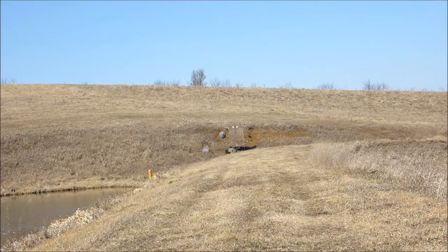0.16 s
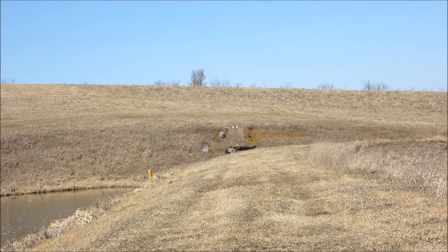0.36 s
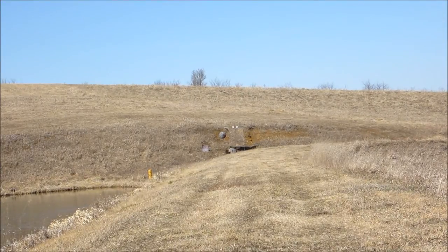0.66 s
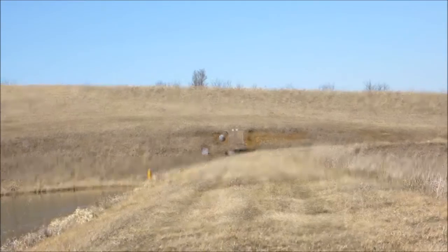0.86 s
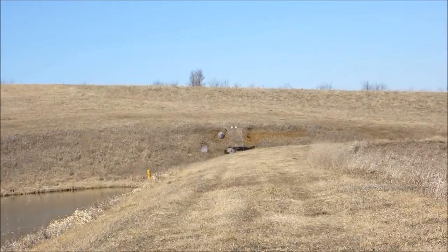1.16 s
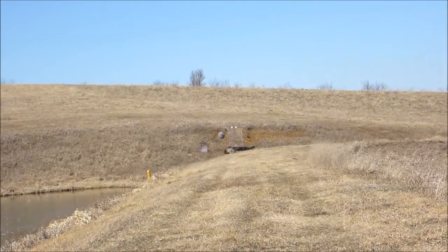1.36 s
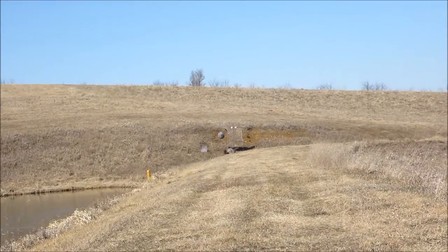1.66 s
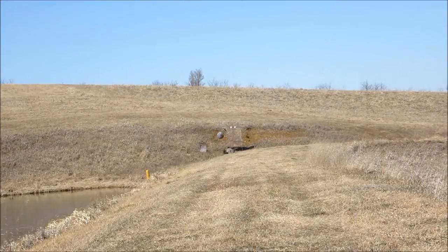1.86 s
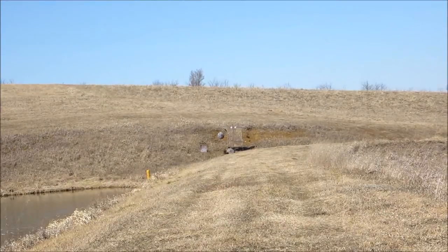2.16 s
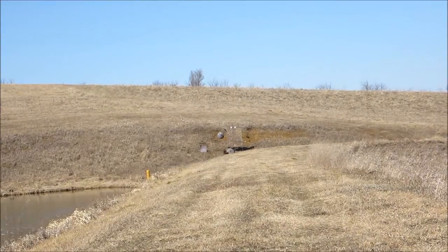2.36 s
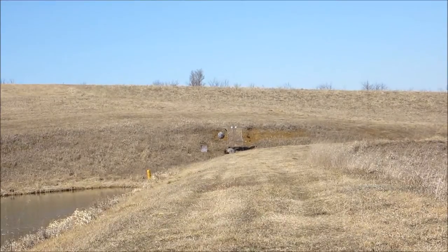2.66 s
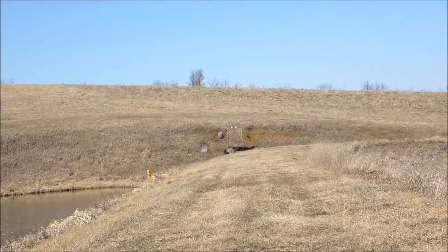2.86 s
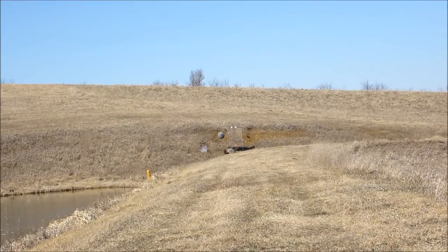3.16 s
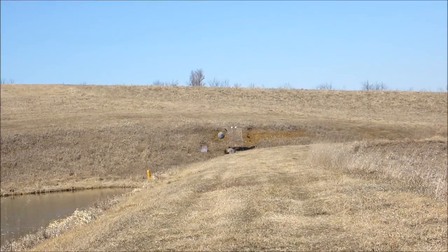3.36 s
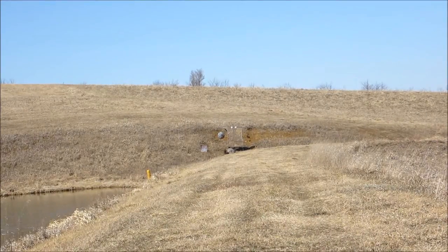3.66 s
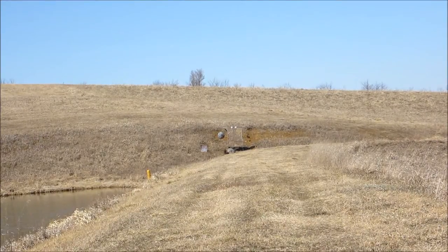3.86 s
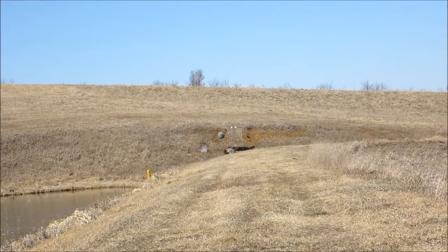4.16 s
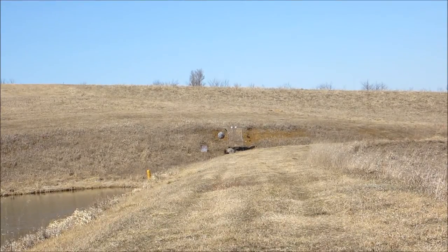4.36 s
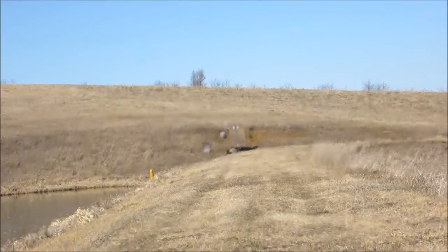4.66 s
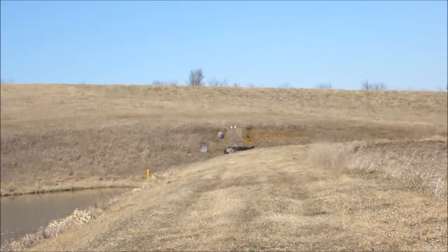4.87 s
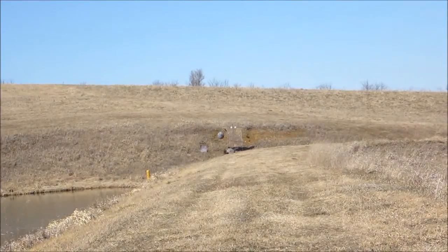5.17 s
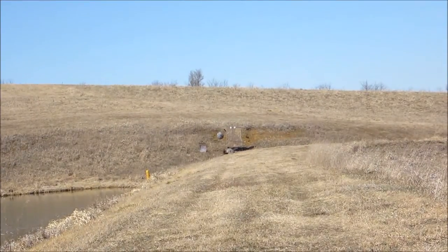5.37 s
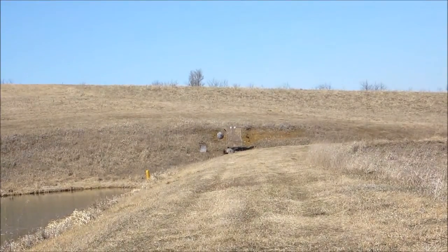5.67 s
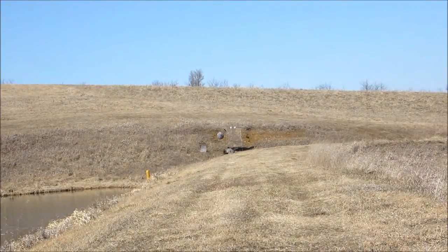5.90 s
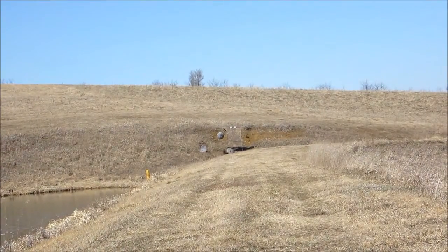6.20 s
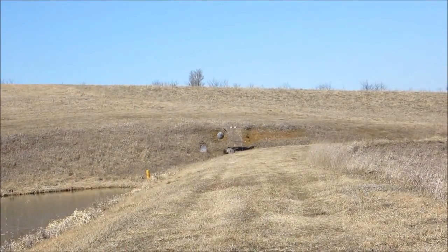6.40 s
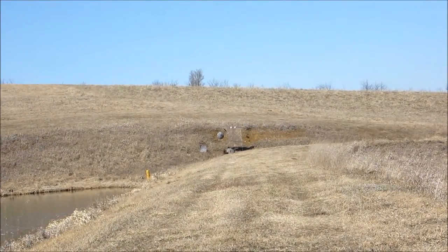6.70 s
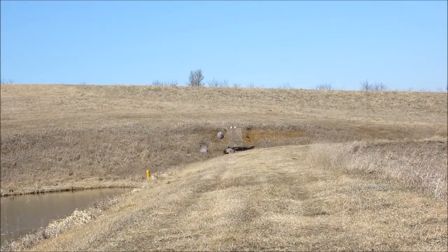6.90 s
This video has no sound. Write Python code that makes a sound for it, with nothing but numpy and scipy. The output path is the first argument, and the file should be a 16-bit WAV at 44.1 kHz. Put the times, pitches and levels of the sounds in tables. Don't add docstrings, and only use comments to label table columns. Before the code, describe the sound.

Outdoors in an open field, a small revolver fires twice close to an overloaded microphone. Each shot is a harsh, clipped crack with a quick scatter and a faint rolling echo from the slopes. Small ticks of the trigger reset follow, then a bright two-part metal clack as the hammer is cocked. Hiss and a low distant motor drone duck after each shot and creep back, while wind puffs thump the microphone.

```python
import sys
import numpy as np
from scipy import signal
from scipy.fft import rfft, irfft
from scipy.io import wavfile
from scipy.ndimage import uniform_filter1d

SR = 44100
rng = np.random.default_rng(int(sys.argv[2]) if len(sys.argv) > 2 else 0)


def volts_from_decibels(level):
    exponent = np.asarray(level, float) / 20
    return 10 ** exponent


def dump(signal):
    limited = np.clip(np.atleast_2d(signal).T, -1, 1)
    pcm = np.round(limited * 32767).astype(np.int16)
    wavfile.write(sys.argv[1], SR, pcm)


N = 310464

SHOT_TIMES_S = [
    0.7837,
    4.6066,
]


def rms_one(x):
    return x / np.sqrt(np.mean(x ** 2) + 1e-20)


def band(x, low_hz, high_hz, order=2):
    edges_hz = [low_hz, min(high_hz, .45 * SR)]
    return signal.sosfilt(signal.butter(order, edges_hz, "band", fs=SR, output="sos"), x)


def ring(x, hz, t60_s):
    radius = volts_from_decibels(-60 / (t60_s * SR))
    angle = 2 * np.pi * hz / SR
    return signal.lfilter([0, np.sin(angle)], [1, -2 * radius * np.cos(angle), radius * radius], x + 1e-18)


def drift(rate_hz, size):
    pole = np.exp(-2 * np.pi * rate_hz / SR)
    noise = rng.standard_normal(size + 8000)
    return rms_one(signal.lfilter([1], [1, -2 * pole, pole * pole], noise)[8000:])


def add(track, start_s, piece):
    at = round(start_s * SR)
    track[at:at + len(piece)] += piece[:N - at]


def blast():
    t = np.arange(int(.06 * SR)) / SR
    jet = rng.standard_normal(len(t))
    gas = rms_one(band(jet, 2800, 4800) + .85 * band(jet, 7000, 15000))
    rumble = rms_one(band(rng.standard_normal(len(t)), 600, 9400, order=1))
    eddies = (rng.random(len(t)) < 1300 / SR) * rng.uniform(-3, 5.5, len(t))
    kicks = uniform_filter1d(eddies, size=3)
    struck = t > .0029

    u = t - .0111
    sag = 80 * np.exp(-u / .0052)
    swing = (1.07 + .5 * np.exp(-u / .0033).clip(0, 1)) * (t > .0055) * (t < .026)
    rock = swing * np.cos(2 * np.pi * (262 * u - 2500 * u ** 2))
    flash = 6 / (1 + np.exp((t - .0066) / .0004)) + .025
    settling = .55 / (1 + np.exp((.0215 - t) / .0008))
    rails = np.clip(sag * (rock - 1 + flash * gas + settling * rumble + kicks), -1, 1) * struck
    spit = gas * (.24 + .3 * np.exp(-((t - .0009) / .0002) ** 2)) * ~struck

    coupling_pole = np.exp(-2 * np.pi * 140 / SR)
    coupled = signal.lfilter([1, -1], [1, -coupling_pole], rails + spit)
    ceiling = .48 + .45 * np.exp(-((t - .004) / .0013) ** 2)
    return np.clip(coupled, -1, 1) * ceiling * np.exp(-(t / .028) ** 4)


def hammer_fall():
    t = np.arange(int(.0068 * SR)) / SR
    swell = volts_from_decibels(-32.5) + volts_from_decibels(-18.5) * np.exp((t - t[-1]) / .00076)
    return band(rng.standard_normal(len(t)), 500, 15000) * swell


def roll():
    # delay after the shot in seconds [s], level [dB],
    # strongest pitch [Hz].
    slopes = [
        (.19, -63, 2500),
        (.235, -62, 2000),
        (.275, -50, 1350),
        (.33, -50, 1700),
        (.45, -49.5, 2800),
        (.52, -52.5, 2500),
        (.62, -56, 1650),
        (.82, -56, 1450),
        (1.5, -68, 650),
    ]
    near_db, near_loss_db_per_s, near_tilt_db_per_octave = -19.5, 408, -2.5
    grass_db, grass_loss_db_per_s, grass_hz = -47, 115, 10000
    below_db_per_octave, above_db_per_octave, deepest_db = 6.5, 10.5, 17
    ridge_octaves, ridge_db, ridge_fade_db_per_s = 1.2, -12.5, 12

    t = np.arange(int(1.85 * SR)) / SR
    delay_s, level_db, top_hz = np.transpose(slopes)
    far_db = np.interp(t, delay_s, level_db)
    far_db = far_db - 300 * (delay_s[0] - t).clip(0) - 30 * (t - delay_s[-1]).clip(0)
    top = np.interp(t, delay_s, np.log2(top_hz))
    clumps, out = drift(45, len(t)), 0
    for low_hz in 125 * 2 ** np.arange(0, 7, .5):
        octave = np.log2(low_hz) + .25
        near = near_db - near_loss_db_per_s * t
        near = near + near_tilt_db_per_octave * max(octave - 9.8, 0) - 3.5 * max(9.8 - octave, 0)
        grass = grass_db - grass_loss_db_per_s * t - 6.5 * abs(octave - np.log2(grass_hz))
        far = far_db - (below_db_per_octave * (top - octave)).clip(0, deepest_db)
        far = far - above_db_per_octave * (octave - top).clip(0)
        ridge = far_db + ridge_db - ridge_fade_db_per_s * (t - .55).clip(0)
        ridge = ridge - 7.7 * abs(octave - top - ridge_octaves)
        air_db = 20 * (t - .2).clip(0) * max(np.log2(low_hz / 5000), 0)
        noise = rms_one(band(rng.standard_normal(len(t)), low_hz, low_hz * 2 ** .5))
        power = volts_from_decibels(2 * near) + volts_from_decibels(2 * grass) + volts_from_decibels(2 * far) + volts_from_decibels(2 * ridge)
        uneven_db = 1.3 * clumps + 1.8 * drift(35, len(t)) + 1.5 * drift(9, len(t))
        out = out + noise * np.sqrt(power) * volts_from_decibels(-.7 - air_db) * volts_from_decibels(uneven_db)
    return out * np.clip((t - .016) / .008, 0, 1)


def echo(db, hz, width_hz, length_s):
    age = np.arange(2000) / SR / length_s
    smear = rng.standard_normal(2000) * age * np.exp(1 - age * 2)
    burst = band(smear, max(hz - width_hz / 2, 30), hz + width_hz / 2)
    return volts_from_decibels(db) * burst / np.abs(burst).max()


def shots():
    # delay after the shot in seconds [s], peak
    # level [dB], centre [Hz],
    reflectors = [(.003, -22.5, 100, 119, .014), (0.0385, -19, 1300, 900, 0.003),
                  (0.0516, -14, 1800, 1100, 0.0011), (0.0506, -30, 5000, 6000, .002),
                  (.062, -33, 1400, 1400, .006), (.098, -40, 5000, 8000, .002),
                  (.159, -36, 2434, 2860, 0.004), (0.284, -38.5, 1080, 694, 0.0047),
                  (0.313, -33, 1380, 1100, 0.005), (0.399, -35.5, 1230, 600, 0.0045),
                  (0.448, -39, 6500, 3000, 0.001), (0.507, -40, 705, 700, 0.0112),
                  (.547, -41, 2700, 900, .004), (.592, -38, 693.6, 897.5, 0.0041),
                  (1.216, -44, 900, 400, 0.019), (1.264, -49.5, 950, 407, .03),
                  (1.515, -46, 796, 484, 0.027)]
    out = np.zeros(N)
    for shot_s in SHOT_TIMES_S:
        add(out, shot_s - .0068, hammer_fall())
        add(out, shot_s, blast())
        add(out, shot_s, roll())
        for delay_s, *shape in reflectors:
            add(out, shot_s + delay_s, echo(*shape))
    return out


def contact(db, frame_hz, part_hz, frame_db):
    t = np.arange(3000) / SR
    t60_s = max(.018 + .00024 * db, .003)
    draw = rng.standard_normal((2, 3000))
    dying = volts_from_decibels(-60 * t / t60_s) + .035 * volts_from_decibels(-60 * t / t60_s / 1.9)
    chatter = draw[0] * np.abs(draw[1]) * dying * np.clip(t / .0002, 0, 1)
    bright = band(chatter, 3000, 12000) + .054 * ring(chatter, part_hz, .008)
    bright = bright + .33 * band(chatter, 1200, 3000) + .13 * band(chatter, 300, 1200)
    frame = ring(chatter, frame_hz, .006)
    knock = volts_from_decibels(frame_db + 9.5) * frame / np.abs(frame).max()
    return volts_from_decibels(db) * (bright / np.abs(bright).max() + knock)


def lockwork():
    # time the cylinder locks in seconds [s], pace as share of the first
    # stroke's length [ratio], level offset [dB].
    cockings = [
        (1.8582, 1, -1.2),
        (5.5348, .94, 0.2),
    ]
    # time from lock in seconds [s], peak level [dB], frame ring [Hz],
    # small part ring [Hz], frame level [dB].
    stroke = [(-.0952, -36.5, 4400, 6960, -22), (-.0902, -43, 4100, 7500, -18),
              (-.0735, -48, 3400, 6900, -20), (-.0665, -32, 4400, 7640, -14),
              (-.0588, -42, 4200, 7140, -19), (-.0478, -30.5, 4240, 6550, -13),
              (-.0318, -36, 4230, 9800, -16), (-.0268, -28, 4220, 9450, -14),
              (.0001, -8.5, 4200, 6900, -16), (.0302, -23.5, 4400, 6900, -19),
              (.0464, -38, 3200, 11200, -17), (.0626, -5.5, 3500, 9200, -19)]
    # time in seconds [s], peak level [dB],
    # frame ring [Hz], small part ring [Hz], frame level [dB].
    ticks = [(0.764, -42, 3320, 7560, -20), (0.766, -36, 3550, 7640, -16),
             (0.9585, -19.5, 5600, 11200, -22), (0.984, -24.5, 4550, 10600, -25),
             (1.45, -48, 3920, 6010, -13), (1.4674, -47, 4170, 6010, -14), (1.554, -52, 6000, 8000, -14),
             (1.5931, -48, 3600, 8440, -20), (1.938, -45, 4950, 7560, -19.5), (2.048, -43, 3900, 9000, -20),
             (2.0512, -32, 3900, 7450, -9), (4.7758, -21.5, 5240, 11200, -25),
             (4.8038, -25.5, 5130, 10600, -26), (5.1946, -46.5, 3080, 8530, -21.5),
             (5.3942, -51, 3530, 9540, -19), (5.7365, -32, 3800, 7750, -9), (5.7235, -45, 4200, 10500, -25),
             (5.519, -42, 3900, 7000, -14), (5.9874, -46, 3140, 7560, -20)]
    # start in seconds [s], stop [s], level [dB], pitch [Hz], waver [Hz].
    spring = [
        (1.831, 1.858, -44, 9500, 90),
        (1.862, 1.872, -44, 9500, 90),
        (1.93, 2.05, -71.5, 6700, 15),
        (5.509, 5.517, -43, 9500, 90),
        (5.522, 5.535, -47, 9500, 90),
        (5.598, 5.608, -46, 9500, 90),
    ]
    # start in seconds [s], stop [s], level [dB].
    slides = [
        (1.793, 1.83, -66),
        (1.827, 1.914, -57),
        (5.472, 5.513, -63),
        (5.503, 5.594, -60),
    ]

    out = np.zeros(N)
    contacts = list(ticks)
    for lock_s, pace, more_db in cockings:
        contacts += [(lock_s + pace * s, db + more_db, *rest) for s, db, *rest in stroke]
    for at_s, *shape in contacts:
        add(out, at_s - .0002, contact(*shape))

    for start_s, stop_s, db, hz, waver_hz in spring:
        size = int((stop_s - start_s) * SR)
        song = np.sin(2 * np.pi * np.cumsum(hz + waver_hz * drift(150, size)) / SR)
        add(out, start_s, volts_from_decibels(db - 4 + 3.5 * drift(90, size)) * song)

    t = np.arange(N) / SR
    sliding = rms_one(band(rng.standard_normal(N), 2200, 10000)) * volts_from_decibels(4.3 * drift(110, N))
    for start_s, stop_s, db in slides:
        out += volts_from_decibels(db) * sliding * ((t > start_s) & (t < stop_s))
    return out


def duck_db():
    depth_db, recovery_s = -27.5, .99
    t = np.arange(N) / SR
    return sum(depth_db * np.exp(-(t - s).clip(0) / recovery_s) * (t > s) for s in SHOT_TIMES_S)


def wind():
    # middle in seconds [s], level under 60 Hz [dB], half length [s],
    # upper band relative level [dB].
    puffs = [(0.02, -27, .035, -16), (.12, -38, .07, -9), (.35, -44, .05, -6), (.48, -35, .04, -30),
             (.575, -32, .025, -10), (.715, -33, .025, -8), (1.94, -46, .035, -3), (2.14, -51, .06, -22),
             (2.57, -41, .05, -20), (2.8, -51, .05, -20), (3.1, -50, .07, -12), (3.62, -37, .03, -20),
             (3.86, -32, .035, -3), (3.97, -32, .045, -15), (4.15, -35, .05, -5), (4.25, -30.5, .03, -22),
             (4.36, -36, .025, -24), (4.44, -34, .04, -20), (4.55, -39, .04, -14), (5.1, -46, .12, -9),
             (5.32, -45, .03, -14), (5.53, -44, .04, -8), (5.88, -38, .07, -24), (6.07, -42, .06, -12),
             (6.2, -41, .06, -6), (6.34, -29, .04, -20), (6.5, -40, .09, -11), (6.8, -38, .06, -22),
             (7.02, -38, .035, -10)]
    # middle in seconds [s], peak level [dB], pitch [Hz], length [cycles].
    thumps = [(3.621, -35.5, 120, .6), (3.842, -25.5, 230, 0.71), (3.869, -17.5, 137, 0.68),
              (3.954, -27.5, 128, 0.62), (3.977, -24.5, 55, 0.45), (4.103, -18, 129, 0.31),
              (4.146, -19, 90, 0.57), (4.174, -20, 255, 0.68), (4.189, -28.5, 207, 0.92),
              (4.351, -29, 53.7, .5), (4.46, -27, 79.6, 0.47), (5.319, -32, 70, 0.3),
              (6.154, -27.5, 109, 0.48), (6.185, -31.5, 90, 0.47), (6.255, -27, 148, 0.34),
              (6.296, -24.5, 198, 0.61), (6.318, -26.5, 90.4, .5), (6.351, -25.5, 55, .6),
              (6.378, -31, 130, 0.63), (6.445, -25.5, 95.3, 0.44), (6.81, -28, 55.2, 0.61),
              (7.011, -23, 60, .4)]
    t = np.arange(0, N, 32) / SR
    low_gain, high_gain = volts_from_decibels(-52), volts_from_decibels(-62)
    for middle_s, db, half_s, upper_db in puffs:
        swell = volts_from_decibels(db) * np.exp(-((t - middle_s) / max(half_s, .01)) ** 2)
        low_gain = low_gain + swell
        high_gain = high_gain + swell * volts_from_decibels(upper_db)
    dip = volts_from_decibels(.5 * duck_db()[::32])
    low = rms_one(band(rng.standard_normal(N), 17, 56)) * volts_from_decibels(1.5 * drift(36, N))
    low = low * np.repeat(dip * low_gain, 32)[:N]
    high = rms_one(band(rng.standard_normal(N), 58, 135, order=3)) * volts_from_decibels(2.0 * drift(17, N))
    high = high * np.repeat(dip * high_gain, 32)[:N]
    for middle_s, db, hz, length_cycles in thumps:
        u = np.arange(-1200, 1200) / SR * hz
        thump = -volts_from_decibels(db) * np.cos(2 * np.pi * u) * np.exp(-(u / length_cycles) ** 2)
        add(high, middle_s - 1200 / SR, thump)
    return low + high


def background():
    # frequency [Hz], density [dB per Hz].
    hiss_colour = [(105, -7), (150, 5.5), (300, -1.5), (600, -4.3), (1280, -7), (2240, -11), (7700, -16.3),
                   (16000, -24.5)]
    # time in seconds [s], level [dB].
    hum_levels = [(0, -49), (2.5, -47.5), (4.6, -48), (5.8, -54), (7.04, -51.5)]
    hiss_db, hum_hz = -55.7, 98
    hz = np.fft.rfftfreq(N, 1 / SR) + 1
    colour_hz, colour_db = np.transpose(hiss_colour)
    colour = volts_from_decibels(np.interp(np.log(hz), np.log(colour_hz), colour_db))
    hiss = rms_one(irfft(rfft(rng.standard_normal(N)) * colour, N))
    t = np.arange(N) / SR
    hum = np.sin(2 * np.pi * np.cumsum(hum_hz + 1.5 * drift(3, N)) / SR) * np.sqrt(2)
    hum *= volts_from_decibels(np.interp(t, *np.transpose(hum_levels)) + 2.0 * drift(6, N) - 1.0)
    return volts_from_decibels(duck_db()) * (volts_from_decibels(hiss_db) * hiss + hum)


def scene():
    return (shots() + lockwork() + wind() + background())[None]


def low_pass(x):
    return signal.sosfilt(signal.butter(12, 16320, fs=SR, output="sos"), x)


def record(dry):
    cut = signal.sosfilt(signal.cheby2(10, 40, 16300, fs=SR, output="sos"), dry)
    mix = np.clip(cut, -1, 1)
    return low_pass(mix)


dry = scene()
out = record(dry)
dump(out)
```